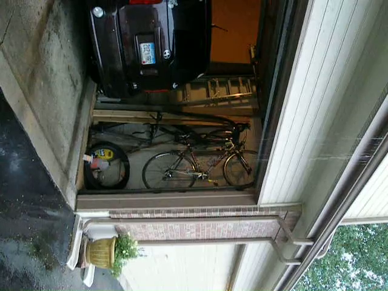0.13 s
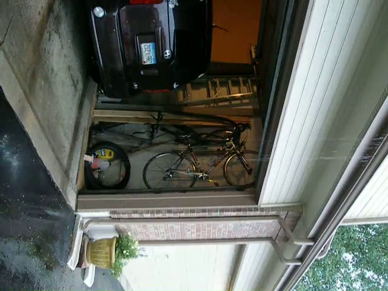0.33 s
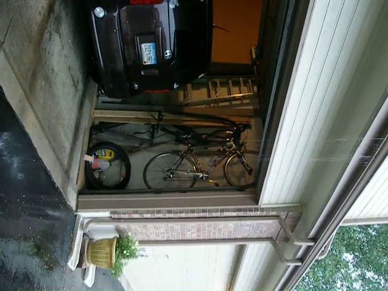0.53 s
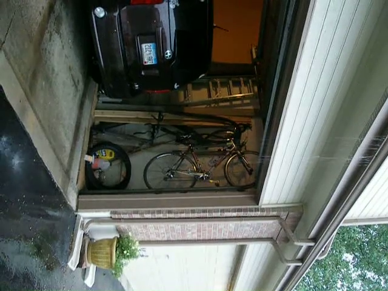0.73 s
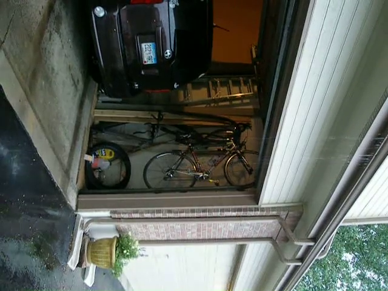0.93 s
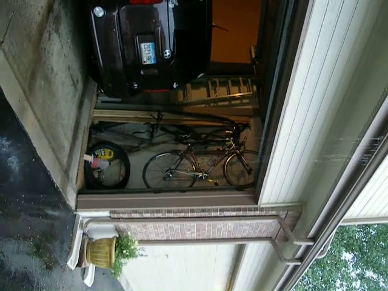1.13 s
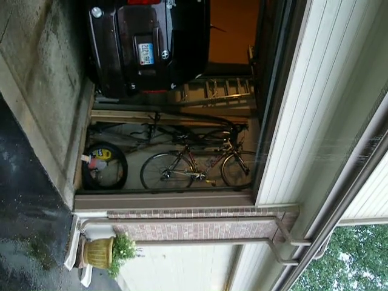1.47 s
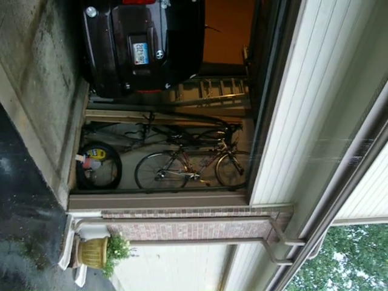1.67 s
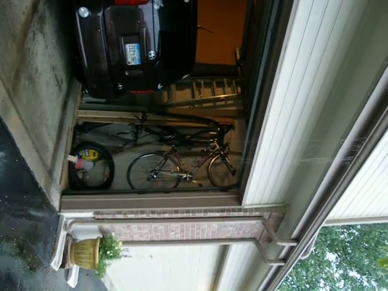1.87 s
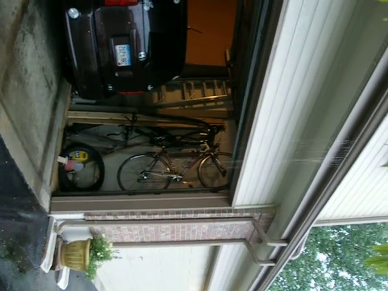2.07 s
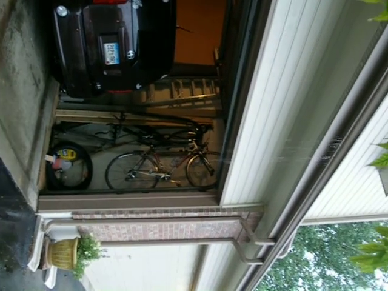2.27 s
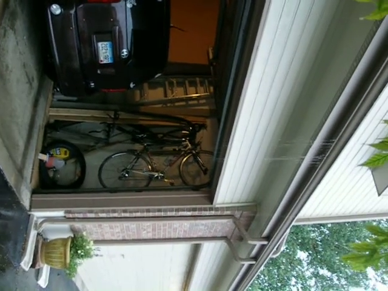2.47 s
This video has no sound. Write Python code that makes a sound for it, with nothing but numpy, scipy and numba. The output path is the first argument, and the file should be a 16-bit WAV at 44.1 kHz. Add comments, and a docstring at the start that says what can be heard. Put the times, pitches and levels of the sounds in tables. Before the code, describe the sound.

Rainwater splatters on concrete outside a garage. Silence until 0.07 s, then a hard microphone pop. Soft steady rain wash and fine patter continue throughout. Sharp drop smacks with short sprays thicken from 0.5 to 1.3 s, with bubbly plops around 1.1-1.3 and at 1.8. The loudest smack lands at 1.5; sparser drops follow, then strong ones at 2.27 and 2.34 and a busy ending to about 2.6. Dull, narrow-band sound.

```python
"""Rain and a gutter's overflow splatter on the concrete outside a garage, heard by a narrow-band camera microphone.
Big drops smack the concrete and throw a short spray; small ones patter. All are damped sines.
Puddle plops and small bubbles are longer damped sines that glide up in pitch.
The wash of rain is coloured noise whose bands swell together and flicker alone.
The camera switches on with a pop, adds a small offset and clips hard."""
import sys
import numpy as np
from scipy import signal
from scipy.fft import rfft, irfft, next_fast_len
from scipy.io import wavfile
from scipy.ndimage import uniform_filter1d
from numba import njit

SR = 44100
rng = np.random.default_rng(int(sys.argv[2]) if len(sys.argv) > 2 else 0)


def store_wav(level_fs):
    """Save 16-bit WAV to argv[1]."""
    pcm = np.round(np.clip(np.atleast_2d(level_fs), -1, 1) * 32767)
    wavfile.write(sys.argv[1], SR, pcm.T.astype(np.int16))


N = 115983  # length in samples
PATTER_HZ = 2700  # middle pitch of the patter, also sets the pivot of the smack's tilt
GLIDE = .12  # upward pitch glide of plops and bubbles
SETTLE_S = .0025  # time constant of the microphone settling after switch-on


def undb(db):
    """Decibels to gain."""
    return 10 ** (np.asarray(db, float) / 20)


def switch_on_pop(u):
    """A brief flat-topped thump, a slower settling and a quick high ring; u is seconds since switch-on."""
    thump = 1.5 * np.exp(-(u / .0003) ** 4)
    settling = .09 * np.exp(-u / SETTLE_S)
    ring = .22 * np.exp(-u / .0005) * np.cos(2 * np.pi * 3550 * u)
    return thump + settling + ring


def random_walk(rate_hz):
    """Random levels held 1 / rate_hz seconds and smoothed twice into slopes; spread near 1."""
    hold = int(SR / rate_hz)
    steps = np.repeat(rng.standard_normal(N // hold + 1), hold)
    return 1.3 * uniform_filter1d(uniform_filter1d(steps, hold), hold)[:N]


def rain_wash():
    """Countless unresolved drops merge into noise, in half-octave bands that swell together and flicker alone."""
    # spectrum of the rain, relative power density: pitch_hz [Hz], level_db [dB per Hz]
    rain_colour = [(30, -15), (55, -10), (120, -.5), (220, 1), (330, 0), (500, 0), (800, .5), (1200, -1.5),
                   (1800, -1), (2400, -2.5), (2800, -7), (3300, -5.5), (3700, -10), (4200, -21)]
    # wash level below and above the crossover, before swell and flicker: time_s [s], bass_db [dB], treble_db [dB]
    wash_levels = [(.08, -38.5, -38), (.2, -39, -40), (.4, -39, -42), (.7, -39.5, -42), (1.0, -40.5, -41),
                   (1.39, -38.8, -42), (1.6, -39.8, -42), (1.85, -39.5, -42), (2.27, -40, -42),
                   (2.48, -41, -41), (2.63, -41.5, -41)]
    cross_hz, swell_db, flicker_db = 1400, .7, .9
    size = next_fast_len(N, True)
    f = np.fft.rfftfreq(size, 1 / SR) + 1  # 1 Hz up, to keep the logarithm finite
    colour_hz, colour_db = np.array(rain_colour, float).T
    colour = undb(np.interp(np.log(f), np.log(colour_hz), colour_db))
    # unit level below the crossover
    bass_rms = np.sqrt(np.mean(colour[f < cross_hz] ** 2) * cross_hz / (SR / 2))
    noise = rfft(rng.standard_normal(N), size) * colour / bass_rms

    t = np.arange(N) / SR
    time_s, bass_db, treble_db = np.array(wash_levels, float).T
    bass, treble = np.interp(t, time_s, bass_db), np.interp(t, time_s, treble_db)
    swell = swell_db * random_walk(3.5)
    wash = np.zeros(N)
    for hz in 35 * 2 ** np.arange(0, 7.6, .5):
        band = np.clip(1 - 2 * np.abs(np.log2(f / hz)), 0, 1)  # triangles that overlap to a flat sum
        high = 1 / (1 + (cross_hz / hz) ** 3)  # share of the treble curve
        level_db = bass * (1 - high) + treble * high + swell + flicker_db * random_walk(14.)
        wash += irfft(noise * band, size)[:N] * undb(level_db)
    return wash


@njit
def grains(n, start, w, cycles, size, glide):
    """Damped sines with a soft onset; start in samples, w in radians a sample, envelope peak at size."""
    out = np.zeros(n)
    for e in range(len(start)):
        tau = cycles[e] * np.pi / w[e]
        first = int(start[e]) + 1
        for i in range(max(first, 0), min(n, first + int(5 * tau))):
            u = i - start[e]
            envelope = np.e * u / tau * 2 * np.exp(-2 * u / tau)
            out[i] += size[e] * envelope * np.sin(w[e] * u * (1 + glide * u / tau / 4))
    return out


def play(start_s, hz, cycles, size, glide=0.):
    """Place one damped sine at each start; pitches are held within 160 to 5000 Hz."""
    one = np.ones(np.size(start_s))
    w = 2 * np.pi * np.clip(np.ravel(hz), 160, 5000) / SR
    return grains(N, np.ravel(start_s) * SR, w * one, np.ravel(cycles) * one, np.ravel(size) * one, float(glide))


def slab_ring(click):
    """The slab's short resonances, excited by the click."""
    # resonances every smack rings: pitch_hz [Hz], level_db [dB], t60_s [s]
    slab = [(1850, -16, .006), (2480, -16, .007), (3300, -13, .007)]
    u = np.arange(1000) / SR
    ring = np.zeros(1000)
    for hz, level_db, t60_s in slab:
        ring += undb(level_db) * 2 * np.pi * hz / SR * np.sin(2 * np.pi * hz * u) * 1000. ** (-u / t60_s)
    return signal.fftconvolve(click, ring)[:N]


def spray(start_s, level_db, hz, count):
    """Thrown droplets land a moment after the smack, count to a drop, at random times and pitches."""
    delay_s, hold_s, fade_s = .0055, .015, .012
    spread_oct, cycles = .34, 2.6
    shape = (len(start_s), count)
    late = rng.random(shape) * (hold_s + 3 * fade_s)
    fade = np.exp(-np.maximum(late - hold_s, 0) / fade_s)
    size = undb(level_db)[:, None] * fade * rng.standard_normal(shape)
    pitch_hz = hz[:, None] * 2 ** (spread_oct * rng.standard_normal(shape))
    return play(start_s[:, None] + delay_s + late, pitch_hz, cycles, size)


def smack(start_s, level_db, hz, tick_db, spray_db, count):
    """A click rings the slab under a bright tick, then spray lands; a high-pass thins it all."""
    gain_db, tilt_db_oct = .6, 4.5  # higher-pitched clicks are louder
    click_db = level_db + gain_db + tilt_db_oct * np.log2(hz / PATTER_HZ * 1.2)
    click = play(start_s + .0013, hz, 1.4, undb(click_db))
    tick = play(start_s + .0016, 3650, 2.2, undb(tick_db))
    hit = click + slab_ring(click) + tick + spray(start_s, level_db + spray_db, hz, count)
    return signal.sosfilt(signal.butter(3, 1600, "high", fs=SR, output="sos"), hit)


def big_drops():
    """Heavy drops hit concrete, each throwing a dense spray."""
    # drops before the smack's gain, tilt and high-pass: start_s [s], level_db [dB], pitch_hz [Hz],
    # tick_db [dB], spray_db [dB against level_db]
    drop_hits = [(.0897, -24, 1880, -28, -20), (.1795, -24, 2600, -33, -22), (.3776, -25, 2040, -40, -21),
                 (.4454, -27, 2400, -36, -20), (.4648, -25, 2300, -32, -21), (.5033, -22, 2290, -40, -22),
                 (.5332, -27, 2700, -41, -23), (.5552, -23, 2150, -42, -23), (.6081, -18, 2500, -27, -23),
                 (.6405, -24, 2200, -40, -23), (.6878, -18, 2800, -22, -20), (.7353, -21, 2650, -35, -22),
                 (.7567, -20, 2050, -42, -19), (.8236, -20, 2000, -33, -21), (.9323, -18, 2500, -27, -23),
                 (.9737, -15, 2700, -29, -21), (1.078, -27, 2570, -34, -22), (1.0989, -19, 2400, -27, -22),
                 (1.1109, -21, 2800, -29, -22), (1.1418, -14, 2350, -34, -22),
                 (1.1892, -24, 2360, -40, -22), (1.2212, -24, 2400, -36, -17), (1.3, -18, 2900, -21, -19),
                 (1.3339, -23, 2500, -31, -22), (1.4496, -25, 2700, -32, -23),
                 (1.4616, -16, 2350, -30, -22), (1.516, -3.8, 2050, -19, -22),
                 (1.6124, -24, 2900, -27, -19), (1.741, -26, 2600, -31, -21), (1.7749, -23, 2500, -33, -22),
                 (1.9281, -24, 3400, -31, -19), (1.9879, -15, 2500, -26, -22),
                 (2.0832, -28, 2600, -33, -22), (2.1012, -27, 3190, -36, -22),
                 (2.1605, -27, 2800, -33, -22), (2.2653, -13, 2430, -36, -20),
                 (2.3112, -25, 2200, -33, -22), (2.3411, -10, 2250, -33, -18),
                 (2.4259, -22, 2950, -31, -23), (2.4559, -16, 3200, -26, -22),
                 (2.4663, -20, 3000, -26, -20), (2.5132, -20, 1700, -27, -22),
                 (2.5616, -15, 2550, -36, -18), (2.606, -22, 2300, -34, -21), (2.6264, -18, 2300, -30, -22)]
    start_s, level_db, hz, tick_db, spray_db = np.array(drop_hits, float).T
    return smack(start_s, level_db, hz, tick_db, spray_db, count=170)


def scatter(per_s, floor_db, scatter_db, middle_hz, octaves):
    """Random times, levels with a long loud tail above floor_db, pitches spread about middle_hz."""
    draws = rng.random((int(per_s * N / SR), 2))
    start_s = draws[:, 0] * N / SR
    level_db = floor_db + scatter_db * np.minimum(-np.log(draws[:, 1]), 4)
    return start_s, level_db, middle_hz * 2 ** (octaves * rng.standard_normal(len(draws)))


def patter():
    """Small drops smack the concrete at random, each with a sparse spray."""
    start_s, level_db, hz = scatter(220, -40, 3.2, PATTER_HZ, .4)
    tick_db = level_db - 5 + 3.5 * rng.standard_normal(len(start_s))
    return smack(start_s, level_db, hz, tick_db, -13.5, count=12)


def small_bubbles():
    """Small bubbles ring at random as damped sines that glide up."""
    start_s, level_db, hz = scatter(250, -45, 2.6, 1150, .7)
    return play(start_s, hz, 4.5, undb(level_db), GLIDE)


def puddle_plops():
    """Drops that trap a bubble in a puddle; the bubble rings and glides up."""
    # plops: start_s [s], level_db [dB], starting pitch_hz [Hz], cycles [decay length in cycles]
    plops = [(.53, -38, 400, 7), (1.092, -29, 1150, 5), (1.162, -27, 2400, 9), (1.2305, -25, 1200, 6),
             (1.255, -30, 290, 8), (1.315, -37, 250, 6), (1.8185, -25, 1250, 6), (2.49, -38, 200, 5)]
    start_s, level_db, hz, cycles = np.array(plops, float).T
    return play(start_s, hz, cycles, undb(level_db), GLIDE)


def scene():
    """All the water, one channel."""
    return (rain_wash() + big_drops() + patter() + small_bubbles() + puddle_plops())[None]


def record(dry):
    """The camera microphone: narrow band, silence until switch-on, pop, offset, hard clipping, steep top."""
    on_s, offset, clip = .07255, .0222, .7
    narrow = signal.sosfiltfilt(signal.cheby2(10, 45, 4780, fs=SR, output="sos"), dry)
    u = np.maximum(np.arange(N) / SR - on_s, 0)
    fade_in = 1 - np.exp(-u / SETTLE_S)
    live = narrow * fade_in + offset - switch_on_pop(u)
    clipped = np.clip(live, -clip, clip) * (u > 0)
    return signal.sosfiltfilt(signal.ellip(8, .1, 50, 16500, fs=SR, output="sos"), clipped)


dry = scene()
out = record(dry)
store_wav(out)
```